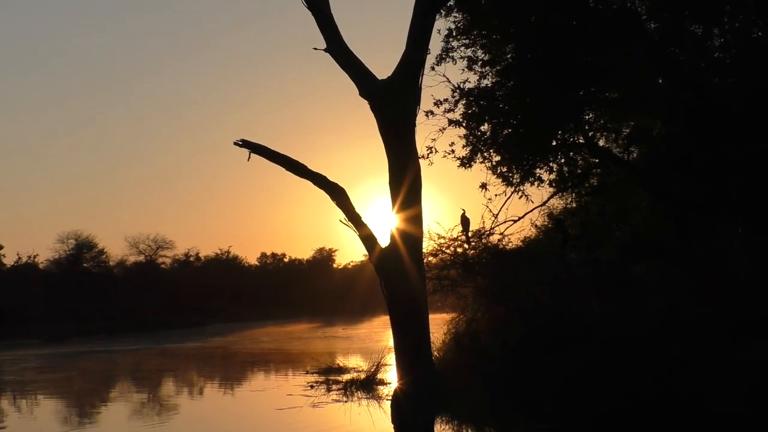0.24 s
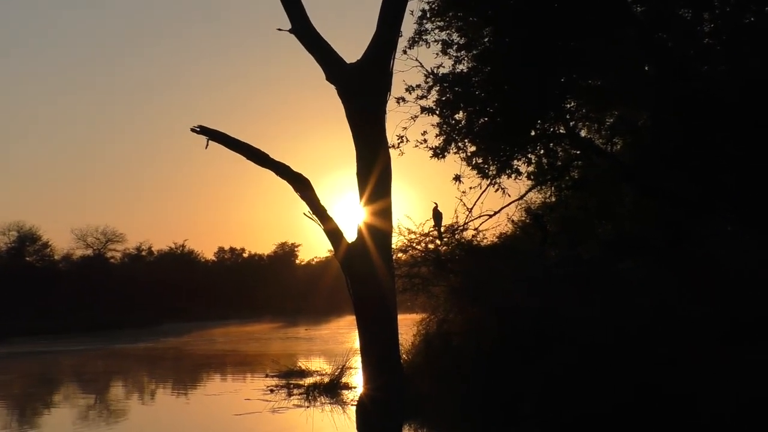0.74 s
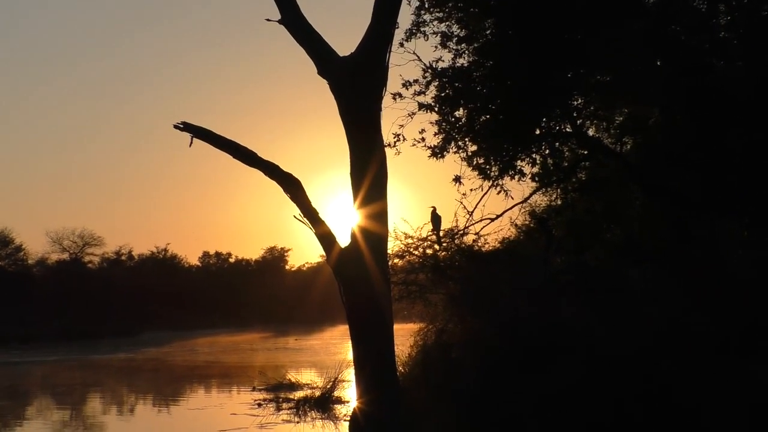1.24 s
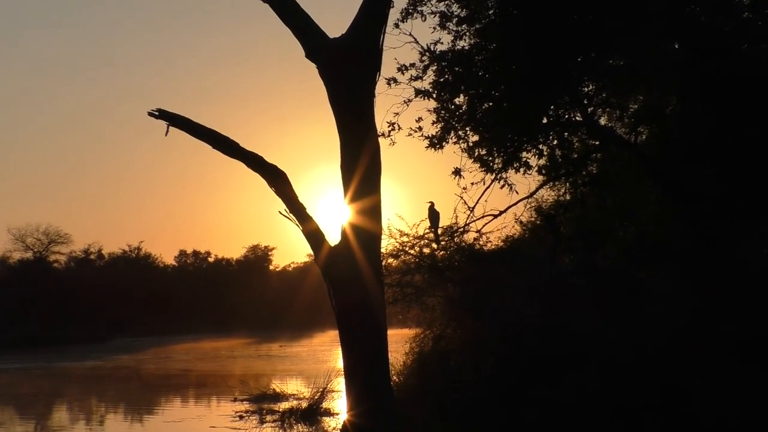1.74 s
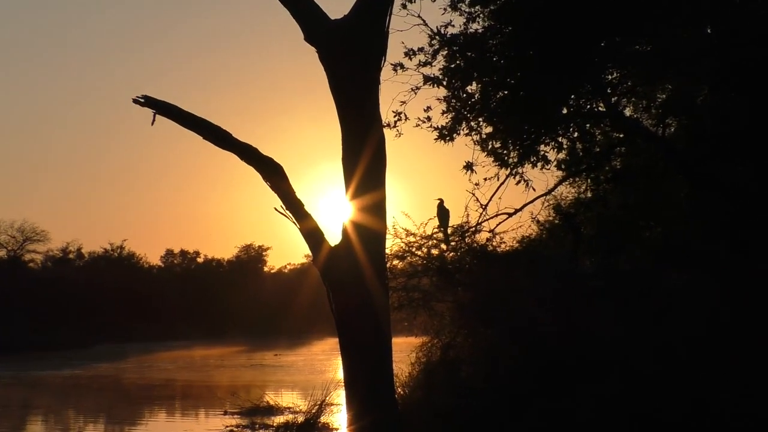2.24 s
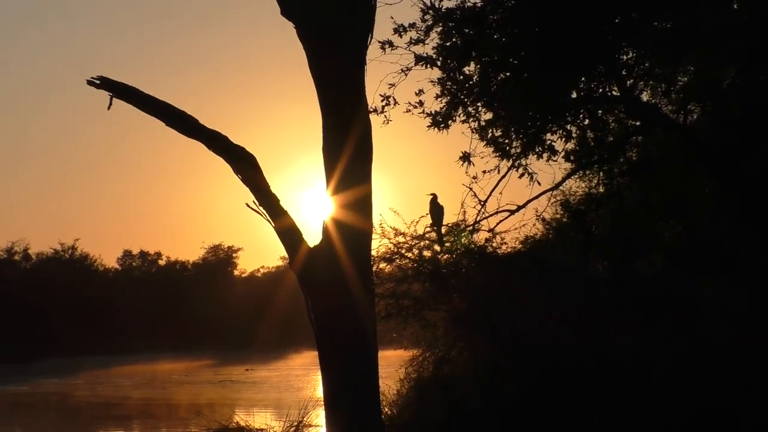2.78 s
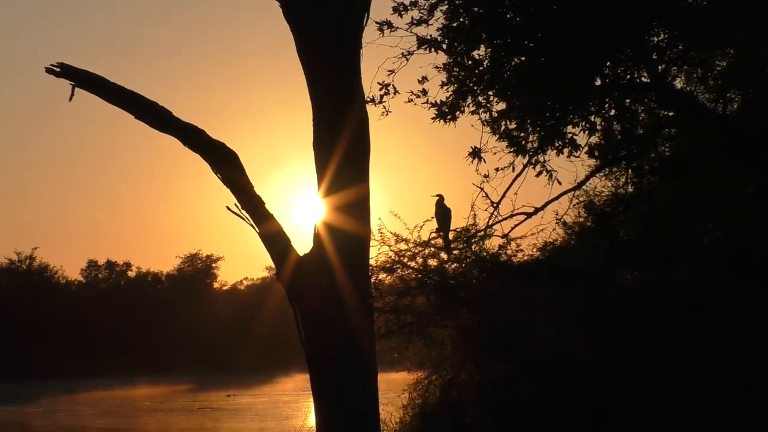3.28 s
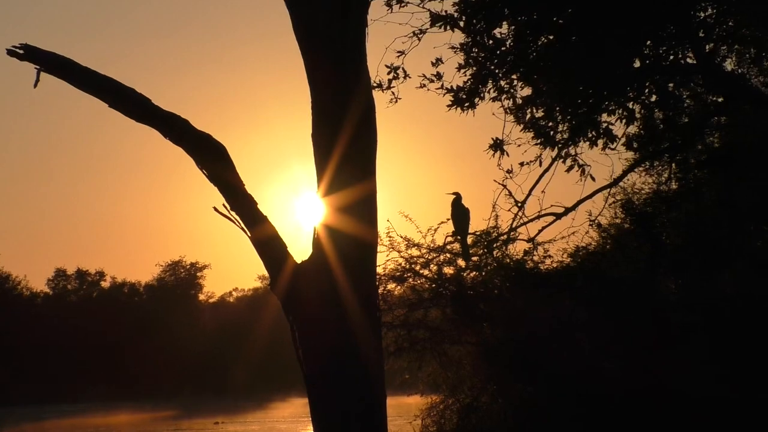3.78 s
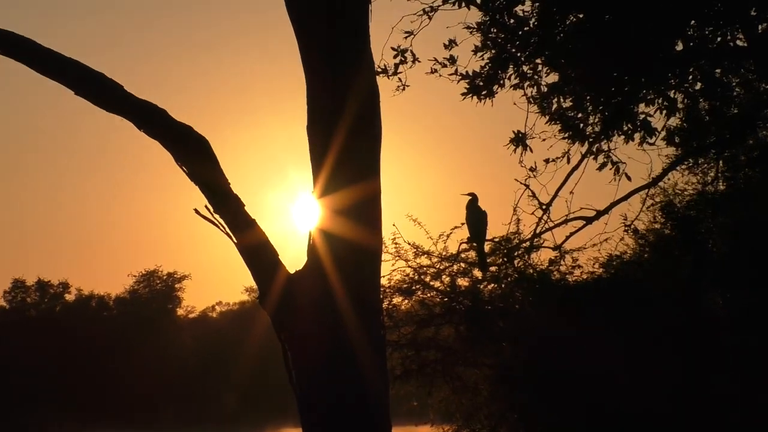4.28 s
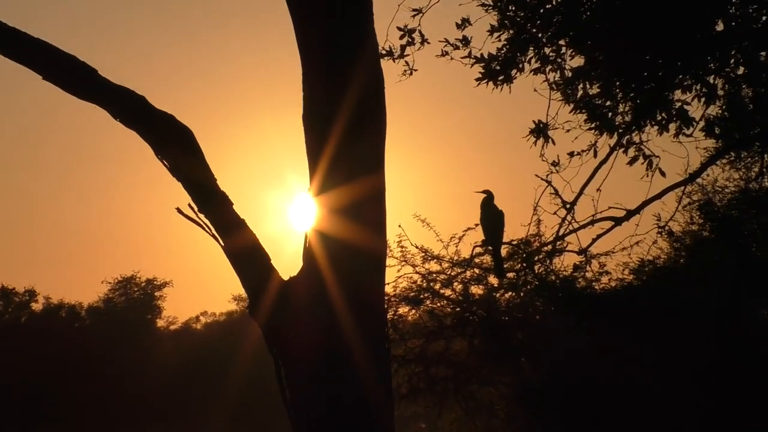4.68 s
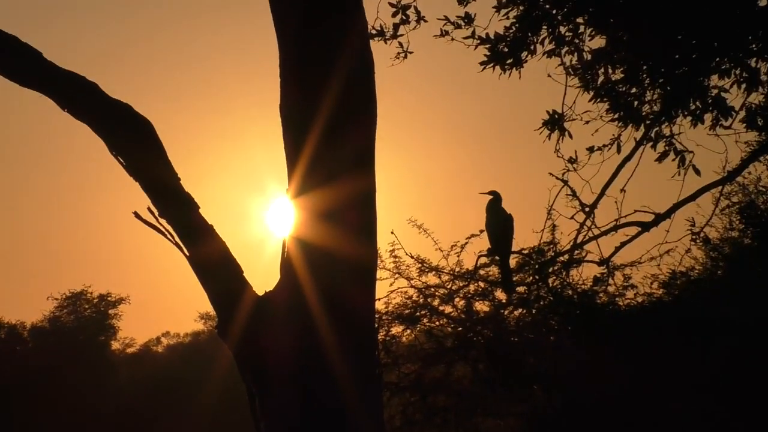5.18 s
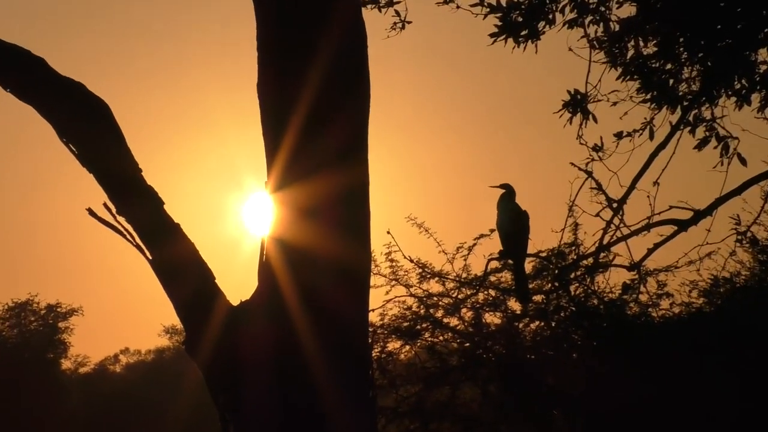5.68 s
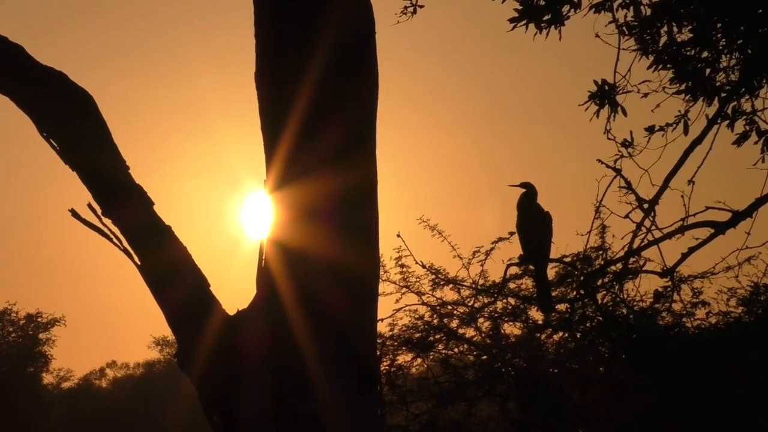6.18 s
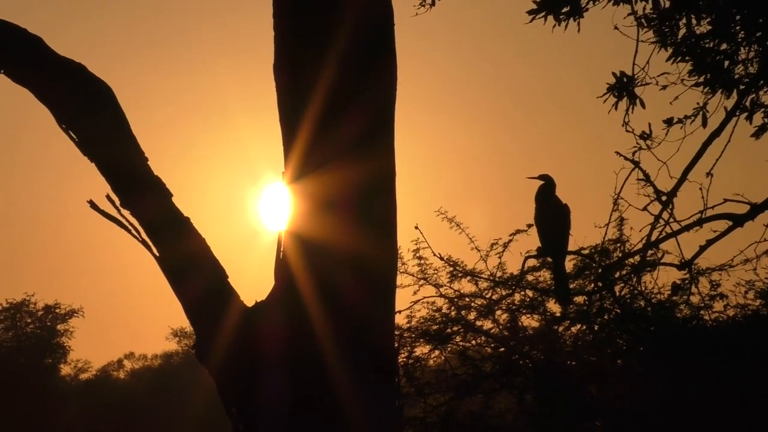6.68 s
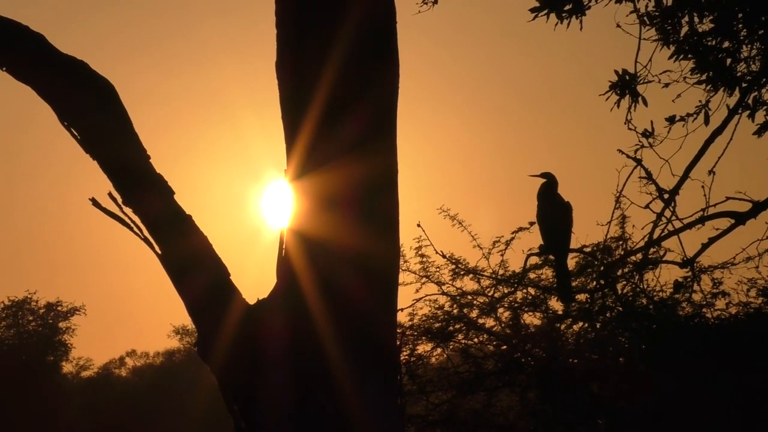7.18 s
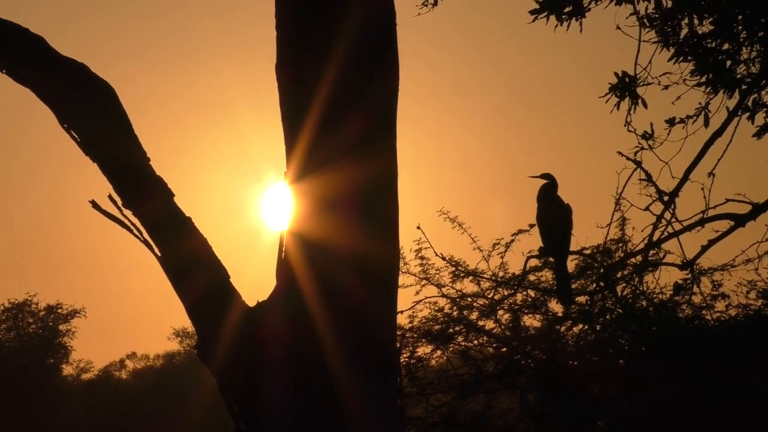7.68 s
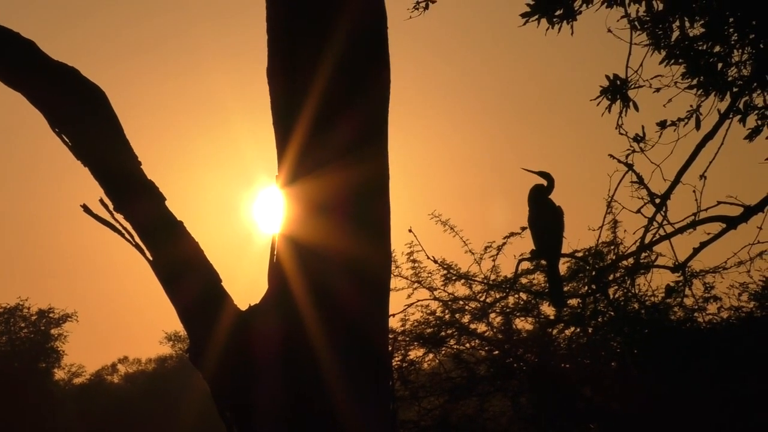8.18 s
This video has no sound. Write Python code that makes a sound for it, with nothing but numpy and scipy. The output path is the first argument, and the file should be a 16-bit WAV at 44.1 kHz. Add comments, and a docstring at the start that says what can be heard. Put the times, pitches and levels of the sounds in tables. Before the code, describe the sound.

A quiet wooded riverbank at dawn: low airy hush, blurred far chorus, faint insect tone and thin hiss throughout. A soft bump at 0.4 s, then three small hard clicks at 0.65-0.77 s, close by. A small bird nearby, slightly right, gives piercing down-slurred chirps at 0.73 and 0.97 s. Wings flutter in quick feathery strokes at 1.2-1.4 s. Distant songbirds whistle short arches, thin twitters and fluted slurs, busiest around 2 s. A farther fowl clucks hoarsely at 2.5, 3.7, 4.4 and 5.1 s, with two clicks at 2.7 and a light thud at 3.84. From 5.7 s it screeches, squeal breaking into raspy cry, at 5.7, 6.4, 7.1, 7.85 and 8.1, most led by squeaks and clear whistles. Rising pips join from 6.6 s. The loudest chirp falls at 7.35, a dull thump at 7.6, wings flutter at 7.9-8.1. Trees return diffuse echoes; ends about 8.4 s.

```python
"""A small bird close by gives three piercing, down-slurred chirps, sines of falling pitch, on a wooded river bank at dawn.
Farther off a ground fowl clucks and later screeches, harmonics and breath chopped by a rattle and filtered by the throat,
after squeaks and whistled notes; distant songbirds whistle in bent sines. Wings flutter in bursts of feather noise,
a small hard case clicks in the hand by ringing its modes, and soft touches thud. The trees scatter the calls as
decaying noise echoes, over filtered noise for a hush, a far dawn chorus, insects and hiss."""
import sys
import numpy as np
from scipy import signal
from scipy.fft import rfft, irfft, next_fast_len
from scipy.io import wavfile

SR = 44100
rng = np.random.default_rng(int(sys.argv[2]) if len(sys.argv) > 2 else 0)


def output_pcm(signal):
    """Save a mono or channel-first signal as 16-bit PCM at the path in sys.argv[1].

    Samples are clipped to [-1, 1] before scaling.
    """
    pcm = np.clip(np.atleast_2d(signal).T, -1, 1) * 32767
    wavfile.write(sys.argv[1], SR, np.round(pcm).astype(np.int16))


N = 371763


def from_db(db):
    """Amplitude ratio: 20 dB is a factor of ten."""
    return 10 ** (np.asarray(db) / 20)


def rms_one(x):
    """Normalisation: divide by the root of the mean power."""
    return x / np.sqrt(np.mean(x ** 2) + 1e-20)


def level_curve(points):
    """Level envelope: straight lines in dB between (time, level) points, sample by sample."""
    time, level_db = np.transpose(points)
    return np.interp(np.arange(N) / SR, time, level_db)


def at_hz(points, hz):
    """Spectral envelope: straight lines in dB on a logarithmic frequency axis."""
    return np.interp(np.log(hz), np.log(np.array(points)[:, 0]), np.array(points)[:, 1])


def bins(size):
    """Frequencies of a discrete Fourier transform, kept above zero."""
    return np.maximum(np.fft.rfftfreq(size, 1 / SR), 1)


def coloured(x, db_at):
    """Linear filtering: weight the spectrum by a function from Hz to dB, then set the rms to 1."""
    size = next_fast_len(x.shape[-1])
    spectrum = rfft(x, size) * from_db(db_at(bins(size)))
    return rms_one(irfft(spectrum, size)[..., :x.shape[-1]])


def drift(rate, size):
    """Band-limited chance: random values, rate per second, joined by lines; spread 1."""
    place = np.arange(size) * rate / SR
    return np.interp(place, np.arange(size), rng.standard_normal(size)) * np.sqrt(3 / 2)


def add(track, s, sound):
    """Superposition: mix a sound into the track from time s on."""
    at = max(round(s * SR), 0)
    track[at:at + len(sound)] += sound[:max(N - at, 0)]


def cycle(hz):
    """Phase is the running integral of frequency."""
    return 2 * np.pi * np.cumsum(hz) / SR


def bend(u, pitches):
    """Quadratic glide through start, middle and end pitch as u goes from 0 to 1."""
    return np.polyval(np.polyfit([0, .5, 1], pitches, 2), u)


def slide(hz, by_hz):
    """Linear glide: its start, middle and end pitch."""
    return hz + by_hz * np.array([-.5, 0, .5])


def panned(x, pan_db, lead_s=0):
    """Interaural cues: a level difference, positive to the left, and a time lead of the left side."""
    size = next_fast_len(N + 64)
    left = irfft(rfft(x, size) * np.exp(2j * np.pi * bins(size) * lead_s), size)[:N]
    return np.array([left, x]) * from_db([[pan_db / 2], [-pan_db / 2]])


def woods(x, near_db, near_t60, far_db, far_t60, gap_s):
    """Diffuse reverberation, echoes only: two exponential decays, near trunks and leaves and the far bank."""
    t = np.arange(2 * SR) / SR
    grain = rng.standard_normal((2, len(t)))
    grain = grain + rng.standard_normal(len(t))   # a shared part makes the two sides partly alike
    near_power = from_db(near_db - 60 * t / near_t60) ** 2 / near_t60
    far_power = from_db(far_db - 60 * t / far_t60) ** 2 / far_t60
    # scaled so that each decay's level is its total energy
    fade = np.sqrt((near_power + far_power) * 2 * np.log(1000) / SR)
    onset = 1 - np.exp(-(t / gap_s) ** 2)
    echoes = rms_one(grain) * fade * onset
    return signal.fftconvolve(x[None], echoes, axes=1)[:, :N]


def whistle(length, pitches, waver, octave_db):
    """Frequency-modulated sine with a weak octave, its power swelling as a half sine; rms 1 at its fullest."""
    u = np.linspace(0, 1, round(max(length, .01) * SR))
    phase = cycle(bend(u, pitches) * (1 + waver * drift(494, len(u))))
    swell = np.sqrt(2 * np.abs(np.sin(np.pi * u)))
    return swell * (np.sin(phase) + from_db(octave_db) * np.sin(2 * phase))


def bed(spectrum, flicker_db, flicker_rate):
    """Diffuse field: filtered noise, partly coherent between the ears, with a restless level."""
    # likeness of left and right: (frequency [Hz], correlation [0-1])
    likeness = [(60, .23), (130, 0.53), (290, 0.18), (640, 0.88), (1410, 0.58), (3100, 0.3), (6820, 1),
                (11500, .5), (15000, 0.49)]
    size = next_fast_len(N)
    hz = bins(size)
    mid, side = rfft(rng.standard_normal((2, size)))
    alike = np.clip(at_hz(likeness, hz), 0, 1)
    both = np.sqrt(1 + alike) * mid + np.sqrt(1 - alike) * side * [[1], [-1]]
    noise = irfft(both * from_db(at_hz(spectrum, hz)), size)[:, :N]
    return rms_one(noise) * from_db(flicker_db * drift(flicker_rate, N))


def background(hush_gain_db=2.5, chorus_gain_db=2.0, insects_db=-58):
    """Many unresolved sources add up to noise: open air, a far dawn chorus, insects and a thin hiss."""
    # spectra, relative: (frequency [Hz], density [dB per Hz])
    hush_spectrum = [(10, -38), (20, -10), (50, -4), (107, -0.5), (200, -.5), (375, -4.5), (500, -9),
                     (600, -22), (900, -7), (2000, -75)]
    chorus_spectrum = [(500, -20), (720, -3), (820, -11.5), (1000, 0.5), (1250, -1), (1700, -1.5),
                       (2400, -3), (2900, -9), (3500, -9.5), (4500, -16), (6500, -24.5), (12000, -25.5)]
    insect_spectrum = [(2000, -71.5), (2600, -9.5), (2850, 0.5), (3050, -7.5), (3400, -14.5), (4500, -50)]
    hiss_spectrum = [(2000, -14.5), (4000, -3), (7000, -10), (9000, 1.5), (10500, 3.5), (12500, 5.5),
                     (14000, 5), (16000, 1.5)]
    # courses of hush and chorus, before their gains above: (time [s], level [dB])
    hush_course = [(0.0, -54.5), (0.65, -53.5), (0.89, -52.5), (1.22, -52), (1.85, -55), (2.89, -54),
                   (3.12, -57), (3.38, -57), (3.76, -53.5), (5.96, -53), (7.25, -55), (7.91, -49),
                   (8.19, -53), (8.43, -54)]
    chorus_course = [(0.0, -52.5), (0.4, -54.5), (1.52, -50), (1.78, -54), (2.06, -55), (2.39, -51.5),
                     (3.12, -54), (3.64, -54), (4.27, -46.5), (4.58, -48), (5.33, -53), (5.82, -51),
                     (6.2, -53), (6.78, -49), (6.97, -51), (7.49, -49.5), (8.03, -46.5), (8.43, -48)]
    # course of the hiss: (time [s], level [dB])
    hiss_course = [(0, -60.5), (1.5, -59), (3.3, -61), (4.2, -59.5), (7, -58.5), (8.43, -58.5)]
    hush_level = from_db(level_curve(hush_course) + hush_gain_db)
    chorus_level = from_db(level_curve(chorus_course) + chorus_gain_db)
    out = hush_level * bed(hush_spectrum, flicker_db=1.74, flicker_rate=20)
    out += chorus_level * bed(chorus_spectrum, flicker_db=1.2, flicker_rate=25)
    out += from_db(insects_db) * bed(insect_spectrum, flicker_db=2.0, flicker_rate=22)
    out += from_db(level_curve(hiss_course)) * bed(hiss_spectrum, flicker_db=0.3, flicker_rate=10)
    return out


def songbirds():
    """Pitch glides set four birds apart: pips and slurs are nearly pure, higher arches and twitters quaver."""
    # one arched note, repeated: (time [s], level [dB])
    arches = [(.091, -50.5), (.922, -51), (1.635, -47.5), (2.435, -45.5), (5.536, -45), (7.618, -42.5),
              (8.338, -43.5)]
    # short rising pips: (time [s])
    pips = [6.61, 6.917, 7.283, 7.46, 7.609, 7.767, 8.15, 8.326]
    # fluted straight slurs: (time [s], length [s], middle pitch [Hz], slide [Hz], level [dB])
    slurs = [(2.105, .055, 2090, -350, -48.5), (2.175, 0.058, 2006, -200, -47),
             (2.281, 0.056, 2036, 200, -48), (2.408, .04, 2140, 170, -48), (3.262, .065, 1890, -340, -52),
             (3.34, .1, 1570, -370, -58), (3.43, 0.035, 1980, -200, -52.5), (6.203, 0.077, 1760, -380, -53),
             (6.692, 0.041, 1540, 297, -49), (6.733, 0.065, 2110, 122, -41.5),
             (6.846, 0.055, 2100, 400, -47)]
    # steep, thin twitters: (time [s], middle pitch [Hz], slide [Hz], level [dB])
    twitters = [(1.887, 3620, 850, -55.5), (1.985, 3950, -700, -57), (2.015, 3900, 800, -57),
                (2.237, 3300, 900, -53), (2.34, 3450, -900, -51)]
    pure, quaver = .008, .028   # random pitch spread, as a share of the pitch
    out = np.zeros(N)
    for s, db in arches:
        add(out, s, from_db(db) * whistle(.058, (2460, 2800, 2720), quaver, octave_db=-26.5))
    for s in pips:
        add(out, s, from_db(-45.5) * whistle(.022, (1924, 1969, 2110), pure, octave_db=-33))
    for s, length, hz, slide_hz, db in slurs:
        add(out, s, from_db(db) * whistle(length, slide(hz, slide_hz), pure, octave_db=-33))
    for s, hz, slide_hz, db in twitters:
        add(out, s, from_db(db) * whistle(.044, slide(hz, slide_hz), quaver, octave_db=-28))
    return out


def hand_bumps(slope_db=14, attack_s=0.0032):
    """A soft contact excites a narrow low band: noise falling by slope_db per octave, fading exponentially."""
    # soft bumps of the hand: (time [s], level [dB], centre [Hz], fade to 1/e [s])
    bumps = [(0.371, -48, 324, 0.061), (1.041, -45, 390, 0.023), (3.73, -51.5, 420, .04),
             (3.842, -39.5, 458, 0.0096), (5.63, -44, 287, 0.051), (7.588, -36, 217, 0.021)]
    out, t = np.zeros(N), np.arange(SR // 4) / SR
    for s, db, hz, fade in bumps:
        thud = coloured(rng.standard_normal(len(t)), lambda f: -slope_db * np.abs(np.log2(f / hz)))
        add(out, s, from_db(db) * thud * np.minimum(t / attack_s, 1) * np.exp(-t / fade))
    return out


def case_clicks(chatter=0.077, chatter_s=0.0072):
    """Modal synthesis: a snap with a short chatter rings damped resonances; soft contacts are duller."""
    # contacts: (time [s], snap level before softening [dB], low-pass corner [Hz])
    knocks = [(0.6507, -21.5, 3500), (0.7218, -20.5, 4000), (0.7659, -20, 3000), (2.714, -23, 3000),
              (2.741, -22.5, 2200)]
    # modes of the hard case: (frequency [Hz], gain [dB], decay by 60 dB [s])
    modes = [(190, -22.5, 0.079), (324, -8.5, 0.02), (736, -18.5, 0.054), (1180, -6, 0.0091),
             (1720, -4.5, 0.0059), (3140, -6.5, 0.0033), (5760, -19.5, 0.0074)]
    force, out = np.zeros(N) + 1e-18, np.zeros(N)   # the tiny offset keeps the filters from underflow
    t = np.arange(SR // 10) / SR
    for s, db, bright_hz in knocks:
        snap = (t == 0) + chatter * rng.standard_normal(len(t)) * np.exp(-t / chatter_s)
        soft = np.exp(-2 * np.pi * bright_hz / SR)
        add(force, s, from_db(db) * signal.lfilter([1 - soft], [1, -soft], snap))
    for k, (hz, db, t60) in enumerate(modes):
        r, w = from_db(-60 / (t60 * SR)), 2 * np.pi * hz / SR   # pole radius and angle
        ring = signal.lfilter([0, np.sin(w)], [1, -2 * r * np.cos(w), r * r], force)
        out += (-1) ** k * from_db(db) * ring
    return out


def near_bird(flutter_db=1.75):
    """A falling sine with a fluttering level; faint overtones grow with the cube of pitch, as at a tense start."""
    # a slur through three pitches, then a quick drop: (time [s], slur [s], start [Hz], middle [Hz],
    # end [Hz], drop [s], last pitch [Hz], swell [s], level [dB])
    chirps = [(.732, 0.08, 6080, 5240, 4440, 0.01, 2970, 0.071, -18),
              (0.965, 0.081, 5680, 5074, 4267, 0.013, 3880, 0.068, -17.5),
              (7.352, 0.11, 6750, 4900, 3995, .05, 2580, 0.055, -16)]
    swell_power = 1.42   # amplitude grows with this power of time
    octave_db, twelfth_db = -49.5, -55   # overtones as the pitch passes 5 kHz
    tone, shimmer = np.zeros((2, N))
    for s, slur_s, start_hz, middle_hz, end_hz, drop_s, last_hz, swell_s, db in chirps:
        t = np.arange(0, slur_s + drop_s, 1 / SR)
        slur = bend(np.minimum(t / slur_s, 1), (start_hz, middle_hz, end_hz))
        hz = slur + (last_hz - end_hz) * np.maximum(t - slur_s, 0) / drop_s
        release = np.clip((t - swell_s) / max(t[-1] - swell_s, 1 / SR), 0, 1)
        shape = np.minimum(t / swell_s, 1) ** swell_power * np.cos(np.pi / 2 * release) ** 2
        phase = cycle(hz)
        level = from_db(db + flutter_db * drift(300, len(t)))
        add(tone, s, np.sqrt(2) * shape * level * np.sin(phase))
        overtones = from_db(octave_db) * np.sin(2 * phase) + from_db(twelfth_db) * np.sin(3 * phase)
        tension = (hz / 5000) ** 3
        add(shimmer, s, np.sqrt(2) * tension * shape ** .15 * (1 - release) * overtones)
    return tone, shimmer


def wings(grain_db=2.0):
    """Turbulent air through feathers is noise: each stroke swells and fades exponentially, finely crackling."""
    # strokes: (time of peak [s], level [dB], swell to 1/e [s], fade to 1/e [s], treble tilt [dB per octave])
    strokes = [(1.227, -31, 0.0058, .017, -1.2), (1.311, -31.5, 0.0033, 0.021, 1),
               (1.367, -34.5, .018, .022, .5), (6.973, -44, 0.0033, 0.019, 5.5),
               (7.898, -37.5, 0.021, .026, 6.5), (7.928, -33.5, 0.013, .025, 4.5),
               (7.991, -35.5, .034, .05, 3.5), (8.024, -32, .004, 0.021, 3.5),
               (8.058, -36, 0.015, 0.025, 2)]
    # feather spectrum, before the tilt: (frequency [Hz], relative density [dB per Hz])
    feathers = [(300, -14), (600, -19), (1050, -4), (2100, -0.5), (3400, -9.5), (5000, -11), (6500, -14.5),
                (8200, -13), (12000, -22.5), (16000, -33)]
    out, t = np.zeros(N), np.arange(-SR // 10, SR // 5) / SR
    for s, db, swell, fade, tilt_db in strokes:
        crackle = rng.standard_normal(len(t)) * from_db(grain_db * drift(1200, len(t)))
        swish = coloured(crackle, lambda f: at_hz(feathers, f) + tilt_db * np.log2(f))
        add(out, s + t[0], from_db(db) * swish * np.exp(np.minimum(t / swell, -t / fade)))
    return out


def rasp(length, pitch_hz, rough, opening, rattle_hz=190, attack_s=0.01, release_s=0.015):
    """Source and filter: arching harmonics and breath, chopped by a rattle of the syrinx, pass the throat."""
    # throat with the beak nearly shut and wide open: (frequency [Hz], relative gain [dB])
    throat_shut = [(1000, -45), (1800, -30), (2250, 0.5), (2650, -4.5), (3180, 4.5), (3650, 0),
                   (4150, -3.5), (4800, -13), (5800, -18), (6800, -24), (8000, -31)]
    throat_open = [(1000, -52), (1900, -14), (2500, 2.5), (3100, 6.5), (3900, -0.5), (4500, -3), (5100, -7),
                   (6100, -12.5), (7000, -21.5), (8200, -28), (12000, -35)]
    arch, waver, jitter = .15, .016, .045   # shares of the pitch
    breathy = .65   # breath beside the voice at roughness 1
    t = np.arange(round(length * SR)) / SR
    rough = np.clip(rough, 0, .9 - .45 * opening)
    wander = waver * drift(60.8, len(t)) + jitter * rough * drift(494.5, len(t))
    rise = arch * opening * (np.sin(np.pi * t / length) - .8)
    phase = cycle(pitch_hz * (1 + rise + wander))
    # harmonics 2 to 9, without the fundamental
    voice = rms_one(sum(np.cos(k * phase + rng.uniform(0, 2 * np.pi)) for k in np.arange(2, 10)))
    # the rattle runs faster and less steadily as the beak opens
    chop_hz = rattle_hz * (1 + opening * (1 + drift(89.1, len(t)) / 2))
    rattle = 1 + np.sqrt(rough) * np.cos(cycle(chop_hz))
    source = (voice + breathy * rough * rng.standard_normal(len(t))) * rattle
    cry = coloured(source, lambda f: (1 - opening) * at_hz(throat_shut, f) + opening * at_hz(throat_open, f))
    return cry * np.clip(t / attack_s, 0, 1) * np.clip((length - t) / release_s, 0, 1)


def fowl():
    """Register breaks: a squeal drops to a lower cry; a hoarse squeak, a clear note and a lift lead into most."""
    # clucks, each with the beak wider: (time [s], length [s], level [dB], beak opening [0-1],
    # pitch [Hz], roughness before its limit)
    clucks = [(2.504, 0.059, -36, 0.08, 1053, 1.1), (3.69, 0.059, -35, 0.14, 1051, 0.9),
              (4.405, .074, -35, .35, 1055, .8), (5.118, .06, -36, 0.78, 902, .7)]
    # a squeal that breaks into a cry: (time [s], squeal pitch [Hz], break after [s], cry length [s],
    # cry pitch [Hz], cry level [dB], roughness [0-1])
    screeches = [(5.714, 1724, .016, 0.11, 968, -35, 0.46), (6.381, 1762, .026, .12, 1008, -35.5, 0.44),
                 (7.098, 1755, .026, .115, 994, -34.5, 0.38), (7.841, 1716, 0.013, .125, 963, -34.5, 0.39),
                 (8.087, 1296, .046, 0.078, 911, -38, 0.31)]
    # run-ups: (time [s], length [s], squeak pitch [Hz], squeak level [dB], note pitch [Hz],
    # note level [dB], lift level [dB])
    run_ups = [(5.02, .11, 3400, -45.5, 2580, -52, -51), (5.612, 0.12, 3300, -47.5, 2630, -45, -42),
               (6.249, .151, 3150, -43.5, 2550, -34, -37.5), (6.959, .158, 3170, -50, 2518, -35.5, -37),
               (7.701, .164, 3220, -49.5, 2453, -33, -37.5)]
    hoarse, clear = .035, .015   # random pitch spread, as a share of the pitch
    squeal_db, squeal_overlap_s = 1.5, .013   # the squeal stands above the cry and runs on into it
    squeak_s, squeak_fall_hz = .0553, 340
    note_after_s, note_s, lift_s = .038, .06, .038
    note_scoop = .02   # the note's ends lie this share above its middle
    note_sag_db = 6   # the note weakens by this much from start to end
    out = np.zeros(N)
    for s, length, db, opening, pitch_hz, rough in clucks:
        add(out, s, from_db(db) * rasp(length, pitch_hz, rough, opening))
    for s, squeal_hz, break_s, cry_s, cry_hz, db, rough in screeches:
        squeal = rasp(break_s + squeal_overlap_s, squeal_hz, rough, opening=1)
        add(out, s, from_db(db + squeal_db) * squeal)
        add(out, s + break_s, from_db(db) * rasp(cry_s, cry_hz, rough, opening=0.98))
    for s, length, squeak_hz, squeak_db, note_hz, note_db, lift_db in run_ups:
        squeak = whistle(squeak_s, slide(squeak_hz, -squeak_fall_hz), hoarse, octave_db=-13.5)
        note = whistle(note_s, note_hz * (1 + note_scoop * np.array([1, 0, 1])), clear, octave_db=-25)
        lift = whistle(lift_s, (2550, 2600, 2740), clear, octave_db=-19)
        add(out, s, from_db(squeak_db) * squeak)
        add(out, s + note_after_s, from_db(note_db + note_sag_db * np.linspace(.5, -.5, len(note))) * note)
        add(out, s + length - lift_s, from_db(lift_db) * lift)
    return out


def scene():
    """Direct and reverberant sound: callers sit to the right, and the near bird has the weakest echoes."""
    near, shimmer = near_bird()
    ground, far, flutter = fowl(), songbirds(), wings()
    out = panned(near, pan_db=-7.5, lead_s=4e-5)
    out += panned(shimmer, pan_db=-6)
    out += woods(near + shimmer, near_db=-5.5, near_t60=0.26, far_db=-14.0, far_t60=0.88, gap_s=0.0029)
    echoes = woods(ground, near_db=-0.5, near_t60=0.25, far_db=-1.0, far_t60=0.88, gap_s=0.0015)
    out += panned(ground, pan_db=-5.5) + echoes * from_db([[-2.2], [2.2]])   # echoes lean right too
    out += panned(far, pan_db=-5.5)
    out += woods(far, near_db=-1.0, near_t60=0.48, far_db=-11.0, far_t60=0.61, gap_s=0.0046)
    out += panned(flutter, pan_db=-2.0) + case_clicks() + hand_bumps()
    return out + background()


def record(dry):
    """Low-pass filtering: a steep elliptic filter removes the top above 15.9 kHz."""
    cutoff_hz = 15900
    return signal.sosfilt(signal.ellip(12, .1, 80, cutoff_hz, fs=SR, output="sos"), dry)


dry = scene()
out = record(dry)
output_pcm(out)
```